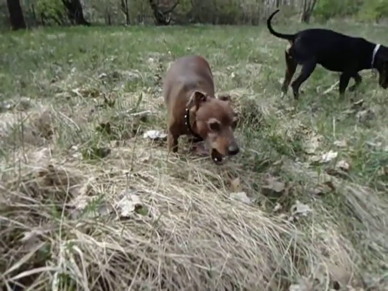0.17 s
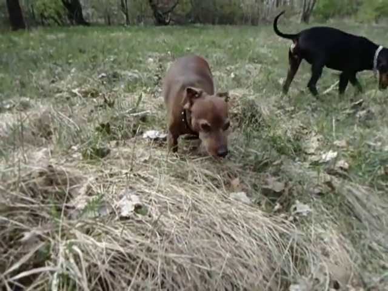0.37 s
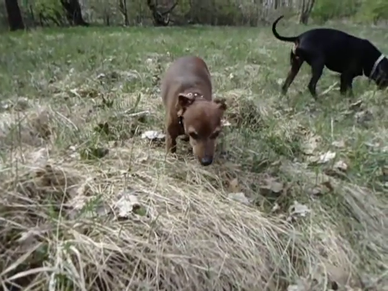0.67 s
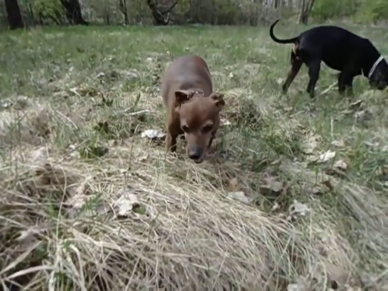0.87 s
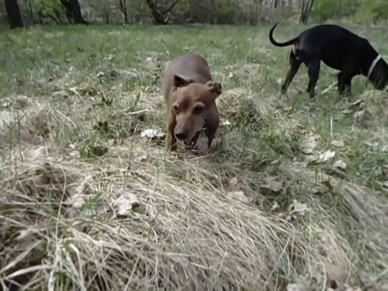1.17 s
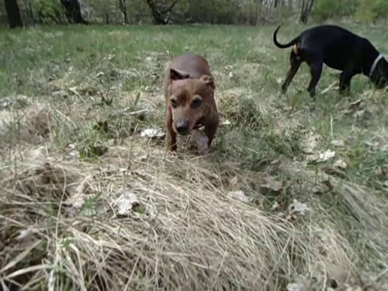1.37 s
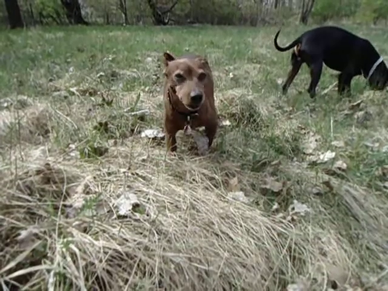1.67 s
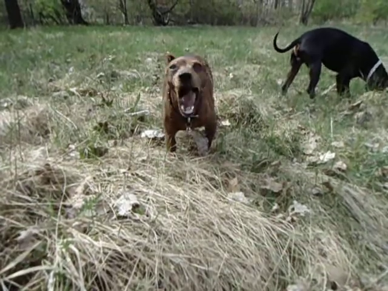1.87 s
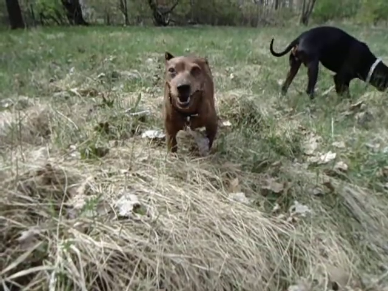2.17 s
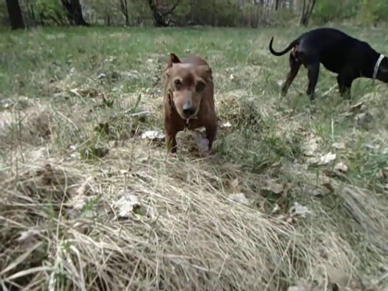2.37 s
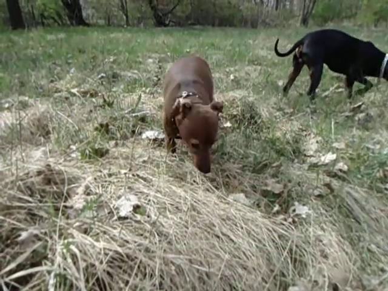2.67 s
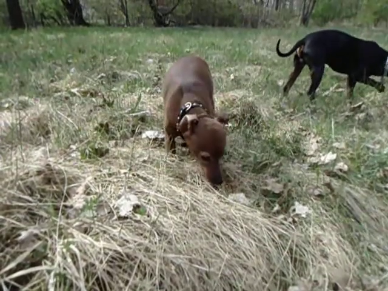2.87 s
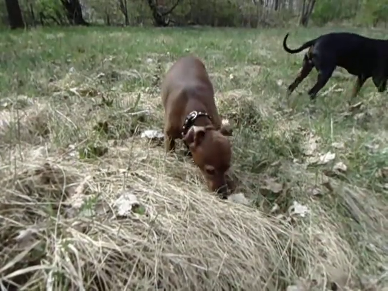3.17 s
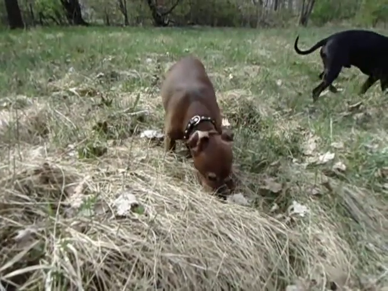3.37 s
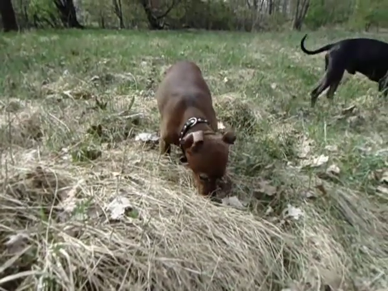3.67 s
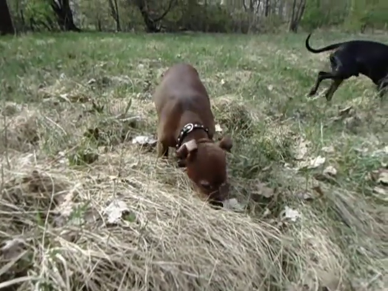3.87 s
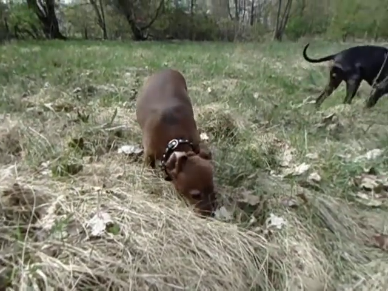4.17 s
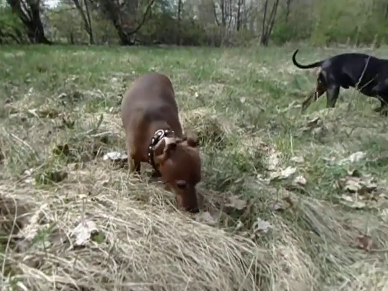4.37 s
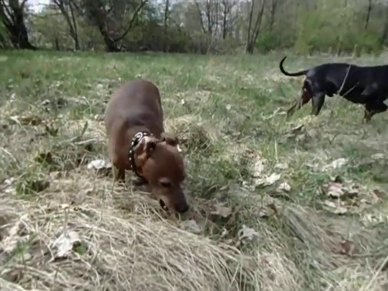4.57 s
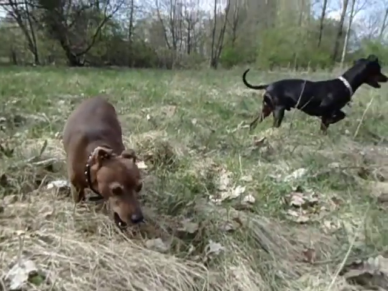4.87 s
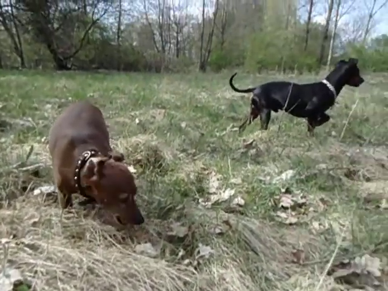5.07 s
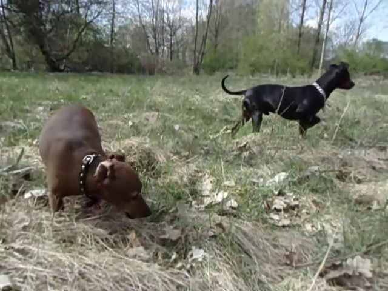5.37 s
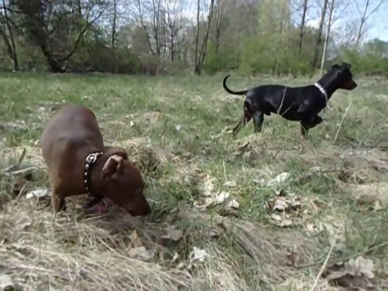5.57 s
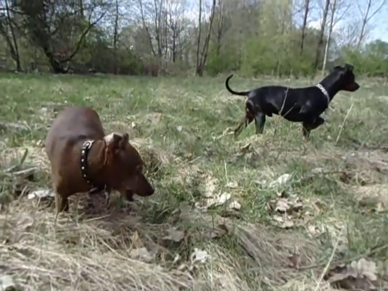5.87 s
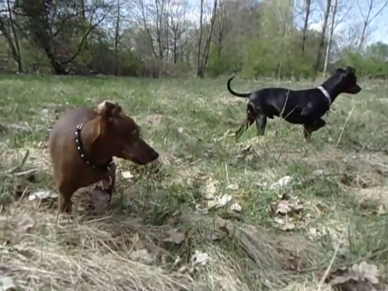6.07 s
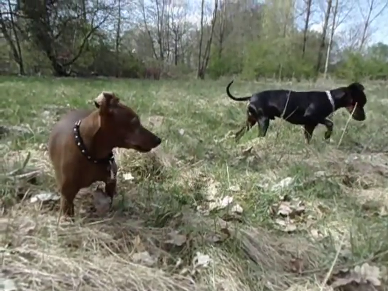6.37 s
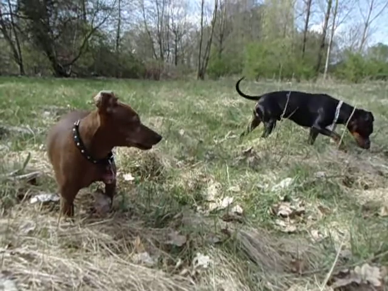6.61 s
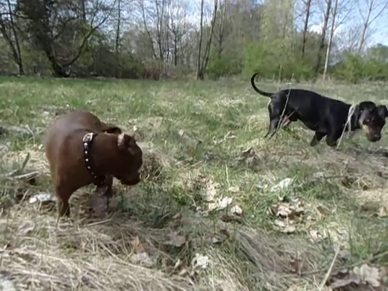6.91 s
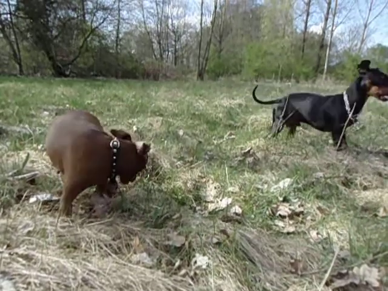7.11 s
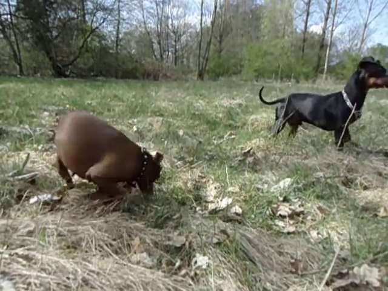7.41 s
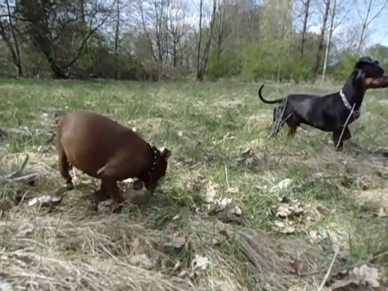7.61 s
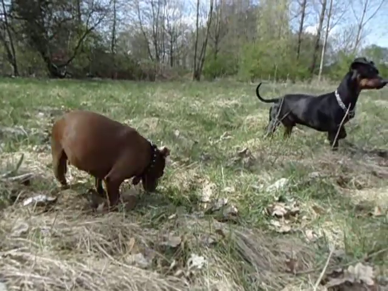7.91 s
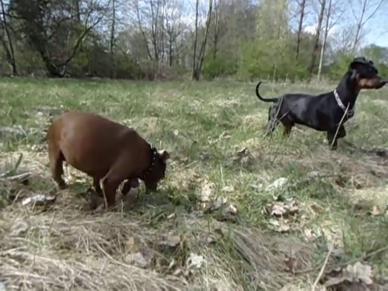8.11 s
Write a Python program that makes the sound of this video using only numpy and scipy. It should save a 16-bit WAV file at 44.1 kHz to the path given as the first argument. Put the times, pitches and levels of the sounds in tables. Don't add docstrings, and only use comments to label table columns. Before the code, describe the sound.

Two small dogs in dry grass, heard without any room echo on a cheap, slightly gritty camera microphone. First come hard kibble cracks and faint straw rustling, then scattered small twig ticks and weak far-off bird notes. A single abrupt yip, far louder than everything else, distorts. The ending is bright scratchy digging, with thin straws snapping over faint steady outdoor noise.

```python
import sys
import numpy as np
from scipy import signal
from scipy.fft import rfft, irfft
from scipy.io import wavfile
from scipy.ndimage import uniform_filter1d

SR = 44100
rng = np.random.default_rng(int(sys.argv[2]) if len(sys.argv) > 2 else 0)


def int16_out(signal):
    q = np.round(np.clip(np.atleast_2d(signal).T, -1, 1) * 32767)
    wavfile.write(sys.argv[1], SR, q.astype(np.int16))


def ratio_of_db(decibels):
    return 10 ** (np.asarray(decibels, float) / 20)


N = 363825


def in_time(rows):
    s, *columns = np.transpose(rows)
    return [np.interp(np.arange(N) / SR, s, c) for c in columns]


def at_hz(points):
    hz, table = np.maximum(np.fft.rfftfreq(N, 1 / SR), 1), np.array(points)
    return ratio_of_db(np.interp(np.log(hz), np.log(table[:, 0]), table[:, 1]))


def rms_one(x):
    return x / np.sqrt(np.mean(x ** 2) + 1e-20)


def ring(clicks, hz, t60_s):
    radius, angle = ratio_of_db(-60 / (t60_s * SR)), 2 * np.pi * hz / SR
    return signal.lfilter([0, np.sin(angle)], [1, -2 * radius * np.cos(angle), radius ** 2], clicks + 1e-18)


# frequency in Hz, density in dB per Hz.
WASH_SPECTRUM = [(12, -61.5), (20, 0), (320, -2.5), (489, -2.5), (590, -3.5), (648, -3), (2720, -12.5),
                 (3520, -14.5), (5010, -16.5), (5500, -20.5), (7150, -75), (12100, -120)]


def wash():
    shaped = irfft(rfft(rng.standard_normal(N)) * at_hz(WASH_SPECTRUM), N)
    return ratio_of_db(-54) * rms_one(shaped)


def breaking(breaks):
    size = 2048
    out = np.zeros(N + size)
    crumb_decay = ratio_of_db(-23) * 0.12 * np.exp(-np.arange(size) / SR / 0.0043)
    for s, ring_db, hz, hard_db, snap_db in breaks:
        splinters = rng.standard_normal(size) ** 3 * crumb_decay
        lags_s = np.r_[0, rng.exponential(0.0004, 5)]
        sizes = np.r_[1, 0.4 * rng.uniform(-1, 1, 5)]
        np.add.at(splinters, np.minimum(lags_s * SR, 500).astype(int), sizes)

        ring_s = np.clip(0.0064 * ratio_of_db(-0.5 * hard_db), 0.003, 0.014)
        body = ring(splinters, hz, ring_s)
        tick = ring(splinters, 2530, 0.0015)
        snap = ring(splinters, 4900 * rng.uniform(0.917, 1.007), 0.004)

        bass_limit_hz = min(0.8 * hz, 1400 if hz < 2200 else 2000)
        small = signal.butter(6, bass_limit_hz, "high", fs=SR, output="sos")
        at = round(s * SR)
        for db, part in (0, body), (hard_db, tick), (hard_db + snap_db, snap):
            part = signal.sosfilt(small, part)
            out[at:at + size] += ratio_of_db(ring_db + db) * part / np.abs(part).max()
    return out[:N]


# start in seconds, mouth ring in dB, mouth ring in Hz, hardness as tick over ring in dB.
KIBBLE_BITES = [(0.0, -46.5, 1710, 7.5), (.0149, -50, 1900, -3), (.032, -41, 1430, -15),
                (.0403, -46, 1370, -5), (0.046, -44, 1260, -6), (0.2518, -42.5, 3530, -3),
                (.324, -44.5, 1910, -10), (.3725, -26, 1710, -1), (0.384, -42, 1700, -5),
                (.403, -24.5, 1850, 1.5), (0.41, -50.5, 1770, 7), (.415, -43, 2400, 1),
                (.491, -54, 1500, 1.5), (.627, -40.5, 2000, -4), (.66, -40, 2270, -3),
                (0.663, -36.5, 1960, 3), (0.674, -37, 1840, -8), (0.6874, -22, 1800, -9),
                (.6906, -28.5, 2000, -7), (.7137, -51, 1500, 4), (.923, -47, 1890, -5),
                (.9429, -36.5, 2040, -5), (0.9563, -44, 1940, 2.5), (0.978, -49, 1610, 0),
                (.9903, -47, 1740, 3), (1.2655, -45, 1760, 2), (1.305, -39.5, 1670, -5),
                (1.428, -47.5, 2800, -7), (6.8587, -33, 1060, -20)]


def kibble():
    return breaking([(*bite, -3.5) for bite in KIBBLE_BITES])


def stalks(low_hz, high_hz, per_s, spread_db, cycles):
    heights = ratio_of_db(spread_db * np.minimum(rng.exponential(1, N), 4)) * rng.choice([-1, 1], N)
    ticks = heights * (rng.random(N) < per_s / SR)
    dealt = rng.integers(0, 10, N)
    bands_hz = np.geomspace(low_hz, high_hz, 10)
    return rms_one(sum(ring(ticks * (dealt == k), hz, cycles / hz) for k, hz in enumerate(bands_hz)))


def pushed(pushes, rustle):
    out = np.zeros(N)
    for s, length_s, db in pushes:
        part = slice(round(s * SR), round((s + length_s) * SR))
        swell = np.sin(np.linspace(0, np.pi, part.stop - part.start)) ** 0.8
        out[part] += swell * ratio_of_db(db + 1) * rustle[part]
    return signal.sosfilt(signal.butter(2, 1300, "high", fs=SR, output="sos"), out)


# start in seconds, length in seconds, level in dB.
NOSE_PUSHES = [(0, 0.064, -58), (.244, .066, -63), (.68, .051, -69), (.9, .095, -57.5), (1.244, .089, -65),
               (1.478, 0.022, -63), (1.695, 0.018, -61), (1.97, .08, -62), (2.0, 0.28, -68),
               (4.454, 0.12, -61), (4.654, .2, -63), (4.683, 0.018, -57), (5.015, .024, -57),
               (5.036, 0.019, -57), (7.322, .2, -65.5), (7.447, .088, -60), (7.627, 0.034, -61)]


def nosing():
    return pushed(NOSE_PUSHES, stalks(1700, 3500, 1000, 4, 12))


# start in seconds, length in seconds, level in dB.
PAW_SWEEPS = [(0, 0.051, -62), (.244, .066, -66), (3.23, 0.041, -60), (3.85, 0.28, -64),
              (4.246, .22, -65.5), (4.454, 0.17, -62), (4.654, 0.23, -59.5), (5.555, 0.03, -63),
              (5.655, 0.017, -62), (7.027, 0.074, -60.5), (7.322, .2, -58.5), (7.447, 0.094, -54),
              (7.515, 0.065, -60), (7.56, 0.072, -52), (7.62, 0.049, -53.5), (7.66, 0.078, -52.5),
              (7.78, 0.089, -60.5), (7.878, 0.061, -54.5), (7.936, 0.036, -53), (7.984, 0.027, -59),
              (8.076, .05, -61)]


def pawing():
    return pushed(PAW_SWEEPS, stalks(3800, 5450, 2500, 3.8, 22))


def gliding(notes):
    out = np.zeros(N)
    waver, flutter = [rms_one(uniform_filter1d(v, size=220)) for v in rng.standard_normal((2, N))]
    for s, length_s, start_hz, db, glide_hz in notes:
        u = np.arange(round(length_s * SR)) / (length_s * SR)
        part = slice(round(s * SR), round(s * SR) + len(u))
        hz = (start_hz + glide_hz * u) * (1 + 0.005 * waver[part])
        swell = ratio_of_db(db + 4 + 2 * flutter[part]) * np.sin(np.pi * u) ** 0.27
        out[part] += swell * np.sin(2 * np.pi * np.cumsum(hz) / SR)
    return out


# start in seconds, length in seconds, pitch in Hz, level in dB.
PIPER_NOTES = [(.01, 0.015, 3420, -62), (.57, .05, 2000, -65), (1.75, .05, 3690, -67),
               (2.58, 0.048, 3480, -68), (3.124, .06, 2920, -66), (3.285, 0.029, 2840, -63),
               (3.8, 0.023, 4500, -64), (4.4, .028, 4100, -60), (4.66, .045, 1696, -63),
               (4.91, .04, 3980, -68), (4.94, .033, 3440, -66), (5.034, 0.058, 3280, -60),
               (5.28, 0.073, 3460, -71), (6.36, 0.083, 3580, -68), (6.632, 0.091, 4800, -68),
               (6.844, .08, 3510, -68)]


def piper():
    return gliding([(*note, 80) for note in PIPER_NOTES])


# start in seconds, length in seconds, pitch in Hz, level in dB.
WHISTLER_NOTES = [(1.57, .09, 4950, -71), (1.69, .04, 4900, -72), (2.03, .042, 5050, -66),
                  (2.5, .06, 4860, -68), (3.47, .045, 4430, -64.5), (5.66, .047, 5060, -72),
                  (6.05, .084, 5030, -69), (6.22, .05, 4950, -71), (2.11, 0.056, 4000, -68),
                  (2.23, 0.061, 3700, -66.5), (5.41, .035, 3830, -68), (5.81, 0.05, 3560, -64.5),
                  (5.855, .04, 3370, -71), (6.25, 0.056, 3550, -65.5), (1.07, .04, 3020, -70)]


def whistler():
    return gliding([(*note, -100) for note in WHISTLER_NOTES])


# start in seconds, ring in dB, ring in Hz,
# tick over ring in dB, snap over tick in dB.
TWIG_BREAKS = [(2.223, -41.5, 2410, 0.5, -12), (2.245, -49, 2860, 3, -10),
               (2.5654, -43.5, 1320, 16.5, -4.5), (2.7008, -55, 2610, -4, 12), (2.7638, -40, 1240, 1, -1.5),
               (2.8044, -46.5, 2580, 2, 3), (2.8264, -41, 1190, 3, -12), (2.8602, -47, 1670, 1, -16),
               (2.9655, -55.5, 2410, 12, 0), (3.252, -46.5, 3600, -5, 1), (3.355, -50, 1030, 8.5, -0.5),
               (3.4542, -49, 1120, -10, 17), (4.4492, -46, 1870, -8, 4), (4.7176, -40, 1680, 3.5, 0),
               (4.783, -37.5, 1260, 0, 8), (4.8083, -48, 3680, 4, -7), (4.866, -50.5, 2660, 1, -9),
               (5.0288, -42.5, 2720, 3.5, -10), (5.2583, -43.5, 1690, 1.5, -7), (5.3325, -50.5, 2890, 1, 6),
               (5.5765, -52.5, 3020, -2, 16.5), (5.5943, -43, 1410, 1.5, 0)]


def twigs():
    return breaking(TWIG_BREAKS)


# start in seconds, length in seconds, first pitch in Hz, level in dB, glide in Hz.
WARBLER_SWEEPS = [
    (4.19, .028, 4750, -61, -800),
    (4.33, .075, 3450, -63, 650),
    (4.475, .02, 2700, -62, 550),
    (4.497, .02, 3100, -63, -600),
]


def warbler():
    return gliding(WARBLER_SWEEPS)


# time in seconds, pitch in Hz, level in dB, every-third-cycle lines in dB.
YIP_PATH = [
    (6.747, 520.6, -57.5, -28.5),
    (6.755, 545.3, -33.5, -25.5),
    (6.786, 605, -13, 2),
    (6.788, 555, -7.5, -13),
    (6.798, 655, -8, -15),
    (6.809, 505, -7.5, -11),
    (6.813, 575, -13.5, -4),
    (6.827, 574, -23, -24),
    (6.832, 580, -34, -17),
]
# resonance in Hz, width in Hz, level in dB.
THROAT_RESONANCES = [
    (680, 215, -15),
    (965.4, 260, 1),
    (1217.5, 260, -3),
    (2330, 760, -10.5),
    (3420, 760, -22),
    (4520, 900, -31),
]
# start in seconds, length in seconds.
BREATH_SURGES = [
    (6.7876, .0042),
    (6.8012, .0045),
]


def yip():
    last_s, last_hz, last_db, last_third_db = YIP_PATH[-1]
    end_s = last_s + 0.018
    path = YIP_PATH + [(end_s, last_hz, last_db - 15, last_third_db)]
    part = slice(round(YIP_PATH[0][0] * SR), round(end_s * SR))
    hz, level_db, third_db = [curve[part] for curve in in_time(path)]
    t = np.arange(part.start, part.stop) / SR

    fading = np.clip((t - 6.811) / 0.02, 0, 1)
    open_db = -2 - 0.05 * (level_db + 8) + 5 * fading
    surging = sum(1.0 * (t > s) * (t < s + length_s) for s, length_s in BREATH_SURGES)
    level_db = level_db + 4.6 * uniform_filter1d(surging, size=40)

    wobble = rms_one(uniform_filter1d(rng.standard_normal(len(hz)), size=60))
    turns = 2 * np.pi * np.cumsum(hz * (1 + 0.02 * wobble)) / SR / 3
    starts = rng.uniform(0, 2 * np.pi, 27)
    folds = sum(np.cos(k * turns + starts[k]) * (ratio_of_db(third_db) if k % 3 else 1) for k in range(2, 27))
    pulsing = 1 + 1.4 * np.cos(3 * turns)
    breath = 5 * ratio_of_db(-16 + 8 * fading) * rng.standard_normal(len(hz)) * pulsing

    chest_db = -0.35 * (level_db + 4.5)
    jaw_db = 0.08 * (hz - 600)
    shifts_db = [chest_db, 0.42 * third_db - jaw_db, jaw_db, open_db, open_db, open_db]
    voiced = np.zeros(len(hz))
    for k, (centre_hz, width_hz, db) in enumerate(THROAT_RESONANCES):
        once = ring(folds + breath, centre_hz, 2.2 / width_hz)
        twice = ring(once, centre_hz, 2.9 / width_hz)
        voiced += (-1) ** k * ratio_of_db(db + shifts_db[k]) * width_hz ** 2 * twice
    voiced = signal.sosfilt(signal.butter(6, 520, "high", fs=SR, output="sos"), voiced)

    even = voiced / np.sqrt(uniform_filter1d(voiced ** 2, size=130) + 1e-20)
    out = np.zeros(N)
    out[part] = ratio_of_db(level_db) * even
    return out


# start in seconds, snap in dB.
STRAW_SNAPS = [(7.522, -37), (7.532, -40), (7.634, -40), (7.6436, -36), (7.68, -37), (7.6943, -38),
               (7.704, -42), (7.7206, -50), (7.9394, -36), (7.956, -42), (7.9962, -39.5)]


def straw_snaps():
    return breaking([(s, db - 19, 3600, 0, 19) for s, db in STRAW_SNAPS])


def scene():
    ground = nosing() + pawing() + twigs() + straw_snaps()
    dogs = kibble() + yip()
    birds = piper() + whistler() + warbler()
    return (wash() + dogs + ground + birds)[None]


# frequency in Hz, gain in dB.
RATE_CHANGE_FILTER = [(20, -4), (5000, 0.5), (5170, 1), (5340, -5), (5510, -11), (5700, -10.5), (6030, -22),
                      (6200, -42.5), (6400, -48.5), (6700, -86)]


def slow_sampling(x):
    slower = 4
    slow = signal.sosfiltfilt(signal.butter(12, 5600, fs=SR, output="sos"), x)[::slower]
    slow = np.where(slow < -0.87, slow + 1.1, np.clip(slow, -0.685, 0.685))
    stuffed = np.zeros(N)
    stuffed[::slower] = slower * slow
    return irfft(rfft(stuffed) * at_hz(RATE_CHANGE_FILTER), N)


def low_pass(x):
    return signal.sosfilt(signal.butter(12, 16010, fs=SR, output="sos"), x)


def record(dry):
    since_s = np.arange(N) / SR - YIP_PATH[-1][0]
    duck_db = -2 * (since_s > 0) * np.exp(-np.maximum(since_s, 0) / 13)
    smooth = slow_sampling(dry[0] * ratio_of_db(duck_db))
    return low_pass(np.clip(smooth, -0.695, 0.695)[None])


dry = scene()
out = record(dry)
int16_out(out)
```